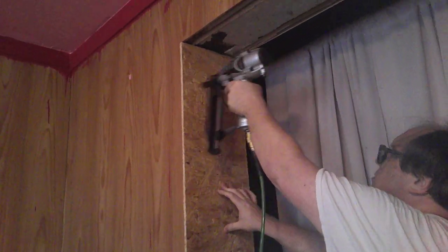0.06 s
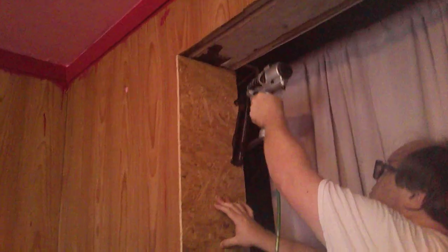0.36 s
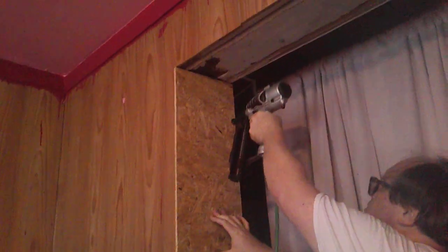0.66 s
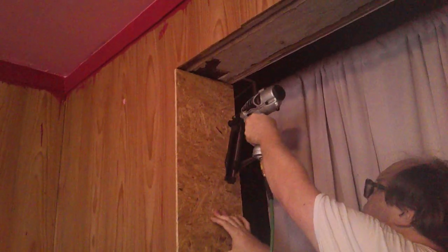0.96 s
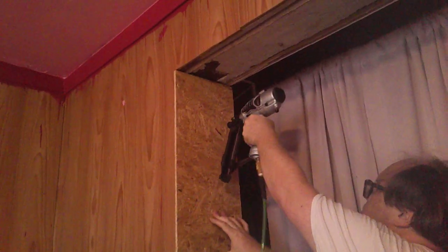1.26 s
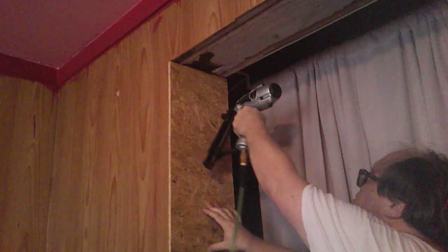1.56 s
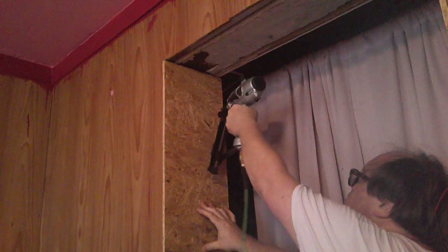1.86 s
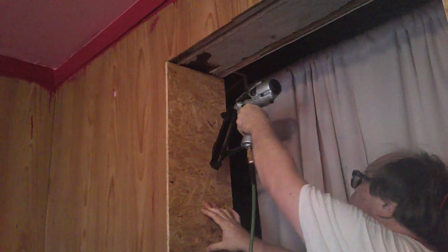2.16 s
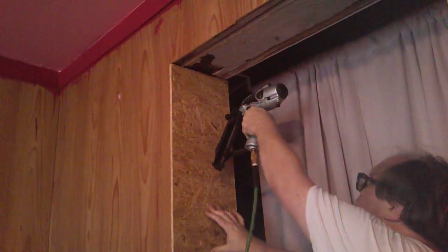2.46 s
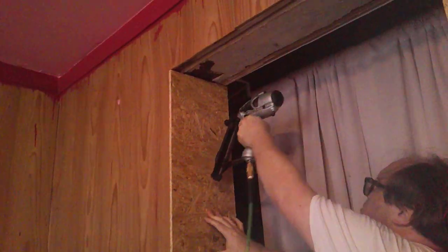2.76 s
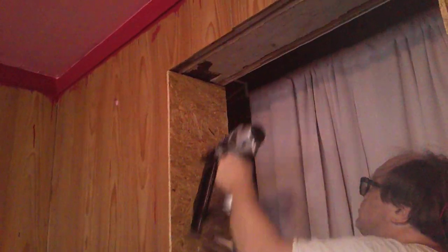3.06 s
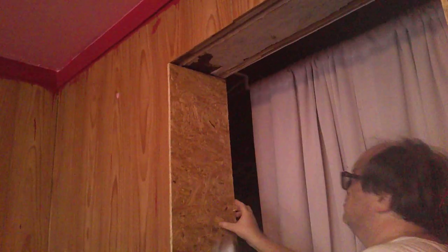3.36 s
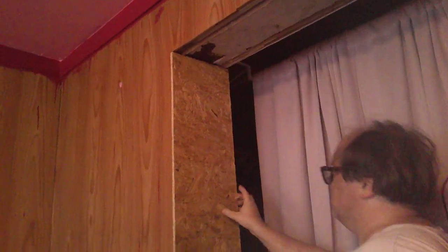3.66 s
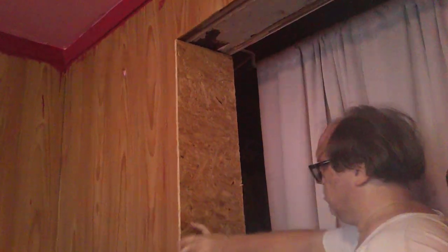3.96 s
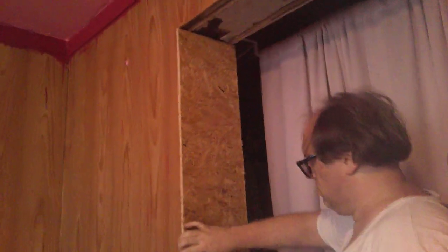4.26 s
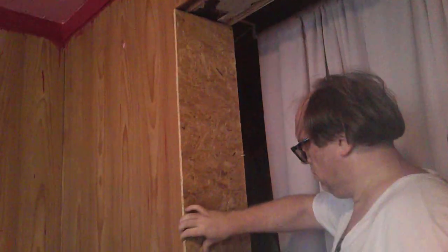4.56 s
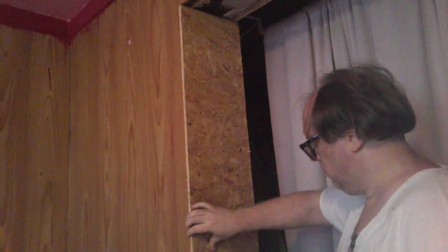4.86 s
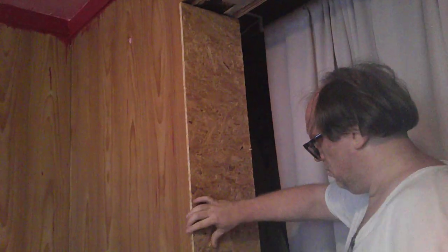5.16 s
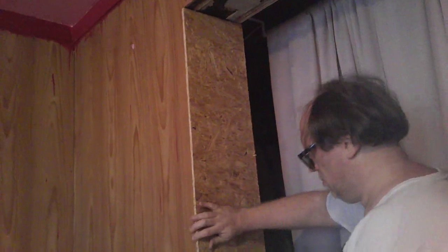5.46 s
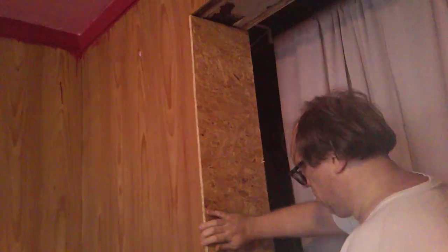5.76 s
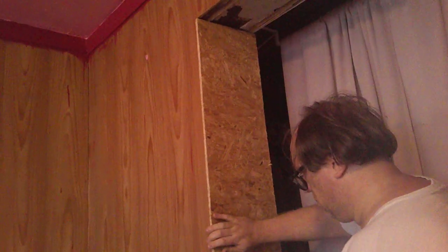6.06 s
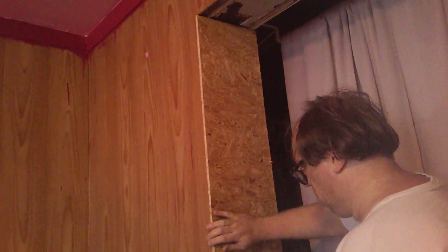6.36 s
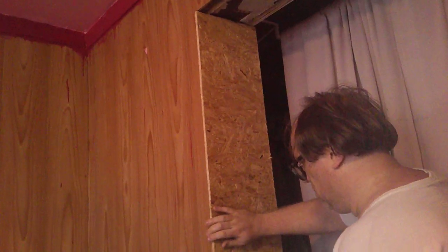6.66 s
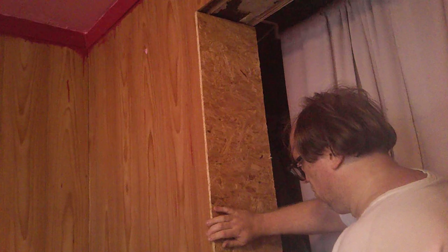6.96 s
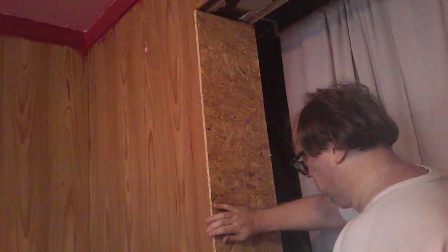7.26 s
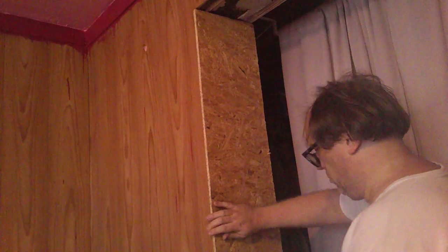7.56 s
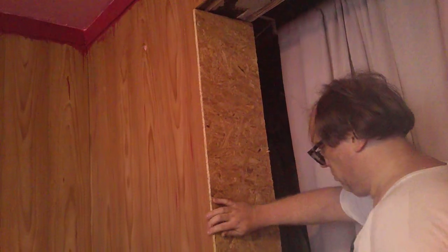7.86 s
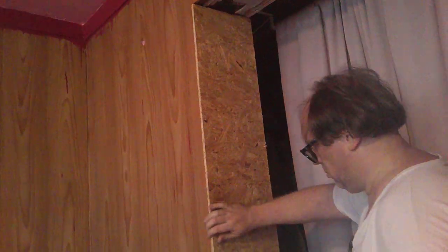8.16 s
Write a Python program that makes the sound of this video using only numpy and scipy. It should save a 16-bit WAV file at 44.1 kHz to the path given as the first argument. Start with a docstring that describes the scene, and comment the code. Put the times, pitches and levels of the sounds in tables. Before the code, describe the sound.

In a small, quiet room, a pneumatic nail gun knocks lightly against a wooden board and its metal fittings clink. It fires one loud, sharp shot, followed at once by a short hiss of air. Faint taps, scuffs and clinks follow as the tool and a hand move on the board, then a second shot and air burst. The shots are close and slightly overload the microphone.

```python
"""A pneumatic nailer drives two nails into a board lining a window recess, in a small panelled room.
Over low room tone, fittings clink and the tool knocks and scuffs against the board. At 2.4 s the first
shot lands, a double blow that overloads the microphone; the trigger is let go, the valve pings and air
puffs out. The tool and a steadying hand then knock and rub on the board until the second shot and its
puff of air at 7.3 s."""
import sys
import numpy as np
from scipy import signal
from scipy.fft import rfft, irfft
from scipy.io import wavfile
from scipy.ndimage import uniform_filter1d

SR = 44100
rng = np.random.default_rng(int(sys.argv[2]) if len(sys.argv) > 2 else 0)


def wrap_up_sound(samples):
    """Save the sound to the file named by the first command line argument, as 16-bit audio."""
    columns = np.atleast_2d(samples).T
    # keep every value between -1 and 1, then stretch to whole-number steps
    tamed = np.clip(columns, -1, 1)
    steps = np.round(tamed * 32767).astype(np.int16)
    wavfile.write(sys.argv[1], SR, steps)


N = 366030
HIT = SR // 2   # samples given to one event
AGE = np.arange(HIT) / SR
GRID_HZ = np.maximum(np.arange(4097) * SR / 8192, 1)
MIC_TOP_HZ = 8220

# room tone spectrum: f/Hz, level/dB
ROOM_TONE_EQ = [(12, -13.5), (25, -4), (60, -4), (90, -0.5), (170, 0), (250, -3.5), (360, -8), (560, -11.5),
                (1900, -17), (3200, -20.5), (5100, -28.5), (7200, -22), (9000, -30)]
# metal fittings click: t/s, level/dB, pitch/Hz, ring level/dB, ring t60/s
CLINK_CUES = [(0.001, -55, 2430, -54, 0.48), (0.7906, -46, 2920, -47, .2), (0.84, -42.5, 1910, -54, 0.18),
              (2.751, -48, 1830, -47, .2), (3.716, -54.5, 3070, -51, 0.14), (6.163, -44, 4040, -49, 0.21),
              (6.654, -59, 2380, -53.5, 0.055), (6.9749, -41.5, 2660, -50, 0.11)]
# modes of the fittings: f/Hz, level/dB
STEEL_MODES = [(1600, -9), (1745, -4), (2090, -2.5), (2400, -18), (2800, -7), (3400, -12), (4000, -10)]
# spectrum of loose parts jingling: f/Hz, level/dB
JINGLE_EQ = [(400, -16), (1200, -8), (1800, 2), (3300, -4.5), (5000, -9), (7200, -8), (9000, -13)]
# spectrum of a touch on the board: f/Hz, level/dB
TAP_EQ = [(60, -29), (300, 4), (700, -1.5), (1800, -2), (3300, -5.5), (5000, -15.5), (7200, -8.5),
          (9000, -11.5)]
# board resonances and the dips between them: f/Hz, width/Hz, gain/dB
BOARD_MODES = [(199, 28, 5.5), (305, 20, 4), (652, 84, 5), (741, 28, 5.5), (808, 30, 5), (990, 4, 2.5),
               (1040, 20, 0.5), (1141, 24, -0.5), (1450, 28, 4), (1550, 8, 7), (1674, 13, 2.5),
               (1652, 38, 5.5), (1680, 24, 2), (1830, 10, -4), (1874, 20, 3.5), (1937, 24, 7),
               (2030, 60, -5), (2103, 32, 6), (2508, 97, 6), (2670, 70, -5.5), (3080, 71, 1.5)]
# tool or knuckles knock on the board: t/s, level/dB, pitch of the spot/Hz, wall thud/dB
KNOCK_CUES = [(0.7897, -34, 547, -34.5), (0.8396, -36.5, 700, -42), (4.345, -54, 1520, -51),
              (4.4407, -59.5, 1100, -57.5), (4.6795, -58, 910, -57.5), (5.4362, -53.5, 1520, -56),
              (6.159, -44.5, 720, -42.5), (6.976, -42.5, 1060, -47.5)]
# spectrum of the wall behind the board: f/Hz, level/dB
THUD_EQ = [(40, -45), (100, -21), (165, -9.5), (205, 5), (280, -12.5), (340, -17), (420, -9), (700, -19),
           (3000, -62)]
# soft scuffs against the board: t/s, level/dB, pitch of the spot/Hz
SCUFF_CUES = [(0.806, -41, 685), (0.824, -44.5, 1790), (1.848, -61.5, 880), (3.184, -60.5, 1800),
              (3.463, -60, 680), (3.692, -55, 1310), (5.473, -57.5, 770), (6.208, -47, 724),
              (6.276, -55.5, 895), (7.005, -50, 1096)]
# two blows to each shot: t/s, level/dB, pitch of the spot/Hz, its width/Hz, its boost/dB
BLOW_CUES = [(2.4225, -1.5, 737.7, 200, 1.5), (2.4380, -0.5, 718, 160.2, 7), (7.2591, -2.5, 1400, 600, -1),
             (7.2726, 1.5, 1172, 811, 7)]
# spectrum of a blow: f/Hz, level/dB
BLOW_EQ = [(40, -40.5), (110, -33.5), (200, -18), (300, -6.5), (400, -6), (600, -7.5), (1400, -1),
           (2200, -6), (3300, -9.5), (5000, -21), (7200, -18), (9000, -19.5)]
# trigger valve snaps open: t/s, level/dB
VALVE_CUES = [(2.5566, 0), (7.3708, -3.5)]
# cylinder vents: t/s, hiss/dB, length/s, puff/dB, hiss tilt/(dB per octave)
EXHAUST_CUES = [(2.5638, -7.5, 0.034, -14, -2.5), (7.371, -4.5, 0.036, -16.5, -1.9)]
# spectrum of the air jet: f/Hz, level/dB
HISS_EQ = [(30, -44), (100, -21.5), (300, -5), (800, -4), (1600, 1.5), (3000, -0.5), (5000, -3.5),
           (6200, 1), (7200, 6), (9000, -1)]
# spectrum of the low puff under it: f/Hz, level/dB
PUFF_EQ = [(30, -46), (85, -31), (130, -3), (185, -1.5), (265, -9), (355, -2.5), (600, -18), (2000, -35.5)]
# hand slides on the board: middle t/s, level/dB, half length/s
RUB_CUES = [(4.215, -58.5, .022), (6.39, -58, 0.068), (6.936, -58, 0.035), (6.967, -47.5, 0.022)]


def from_db(db):
    return 10 ** (np.asarray(db) / 20)


def rms_one(x):
    return x / np.sqrt(np.mean(x ** 2) + 1e-20)


def level_hit(x):
    """Scale a short sound to the energy of 30 ms at rms 1."""
    return x * np.sqrt(.03 * SR / np.sum(x ** 2))


def eq_db(points):
    """Draw an EQ curve through the points along log frequency."""
    hz, db = np.transpose(points)
    return np.interp(np.log(GRID_HZ), np.log(hz), db)


def bell(hz, width_hz):
    """Outline of one resonance, height 1."""
    return 1 / (1 + (2 * (GRID_HZ - hz) / width_hz) ** 2)


def board_db():
    """The board's resonances as one EQ curve."""
    return sum(db * bell(hz, width_hz) for hz, width_hz, db in BOARD_MODES)


def colour(x, curve_db):
    """Minimum-phase EQ: peaks ring after the hit, never before."""
    cepstrum = irfft(np.log(from_db(curve_db)))
    half = len(cepstrum) // 2
    cepstrum[1:half] *= 2
    cepstrum[half + 1:] = 0
    impulse_response = irfft(np.exp(rfft(cepstrum)))
    return signal.fftconvolve(x, impulse_response)[:len(x)]


def low_pass(x, hz, taps):
    """Steep linear-phase high cut."""
    kernel = signal.firwin(taps, hz, window="blackmanharris", fs=SR)
    return signal.fftconvolve(x, kernel[None], "same")


def add(track, s, sound):
    """Mix a sound in at time s."""
    at = max(round(s * SR), 0)
    track[at:at + len(sound)] += sound[:N - at]


def noise_with_tail(power, wet_db, t60):
    """Turbulence or chatter with this power envelope, plus a dying tail of dense reflections."""
    feedback = from_db(-120 / (t60 * SR))   # power falls 60 dB in t60 seconds
    reflections = signal.lfilter([1 - feedback], [1, -feedback], power)
    envelope = np.sqrt(power + from_db(wet_db) ** 2 * reflections)
    return level_hit(rng.standard_normal(HIT) * envelope)


def contact(length_s, crack_db, wet_db, t60):
    """A sharp crack straight from the impact, then dying chatter and its reverb."""
    crack = from_db(crack_db) * level_hit(signal.unit_impulse(HIT))
    return crack + noise_with_tail(np.exp(-2 * AGE / length_s), wet_db, t60)


def tap(pitch_hz, rolloff_db, length_s, crack_db):
    """One touch on the board: the spot resonates, with rolloff_db less per octave to either side."""
    spot_db = 8.5 * bell(pitch_hz, width_hz=200) - rolloff_db * np.abs(np.log2(GRID_HZ / pitch_hz))
    force = contact(length_s, crack_db, wet_db=3, t60=.2)
    return level_hit(colour(force, eq_db(TAP_EQ) + board_db() + spot_db))


def room_tone():
    """A steady bed of low room rumble and microphone hiss."""
    bed = colour(rng.standard_normal(N + HIT), eq_db(ROOM_TONE_EQ))[HIT:]
    return from_db(-58) * rms_one(bed)


def clinks():
    """A bright click, then steel rings and loose parts jingle, only briefly where a hand damps them."""
    out = np.zeros(N)
    for s, db, pitch_hz, ring_db, t60 in CLINK_CUES:
        steel = sum(from_db(mode_db) * np.sin(2 * np.pi * (hz * AGE + rng.random()))
                    for hz, mode_db in STEEL_MODES)
        jingle = from_db(2.5) * rms_one(colour(rng.standard_normal(HIT), eq_db(JINGLE_EQ)))
        ring = (steel + jingle) * from_db(-60 * AGE / t60)
        click = tap(pitch_hz, rolloff_db=1, length_s=.0021, crack_db=-12.5)
        add(out, s, from_db(db) * click + from_db(ring_db) * ring)
    return out


def knocks():
    """Firm knocks on the board sound broad, light ones narrow; the wall behind thuds."""
    out = np.zeros(N)
    firm_db, narrowing = -32, .15   # level of a firm knock; extra rolloff per dB softer
    for s, db, pitch_hz, thud_db in KNOCK_CUES:
        board = tap(pitch_hz, rolloff_db=6 + narrowing * (firm_db - db), length_s=.0022, crack_db=-2)
        wall = colour(contact(length_s=.0022, crack_db=-4, wet_db=8, t60=.3), eq_db(THUD_EQ))
        add(out, s, from_db(db) * board + from_db(thud_db) * level_hit(wall))
    return out


def scuffs():
    """Slow, glancing touches stir the board but not the wall."""
    out = np.zeros(N)
    for s, db, pitch_hz in SCUFF_CUES:
        add(out, s, from_db(db) * tap(pitch_hz, rolloff_db=3.5, length_s=.012, crack_db=-8))
    return out


def shots():
    """Driver meets nail, then the piston bottoms out; the board booms and rattles against its frame."""
    out = np.zeros(N)
    ring_depth = .93   # board resonances, relative to a light tap
    for s, db, pitch_hz, width_hz, boost_db in BLOW_CUES:
        body_db = eq_db(BLOW_EQ) + ring_depth * board_db() + boost_db * bell(pitch_hz, width_hz)
        force = contact(length_s=.023, crack_db=-7.5, wet_db=5.5, t60=.26)
        add(out, s, from_db(db) * level_hit(colour(force, body_db)))
    return out


def valve():
    """The trigger valve snaps open with a ping of a few cycles."""
    out = np.zeros(N)
    pitch_hz, attack_s = 2335, .00058
    rise = AGE / attack_s
    ping = np.sin(2 * np.pi * pitch_hz * AGE) * rise * np.exp(1 - rise)
    for s, db in VALVE_CUES:
        add(out, s, from_db(db) * ping)
    return out


def exhausts():
    """Air splutters out until the cylinder is empty: a bright hiss over a low puff."""
    out = np.zeros(N)
    splutter_db, pressure_fall_s, crossover_hz = 2, .19, 4900
    low_share = np.clip(1 / (1 + (GRID_HZ / crossover_hz) ** 4), 1e-4, 1 - 1e-4)
    for s, hiss_db, length_s, puff_db, tilt_db in EXHAUST_CUES:
        splutter = rms_one(uniform_filter1d(rng.standard_normal(HIT), size=130))
        pressure = np.exp(-AGE / pressure_fall_s) / (1 + (AGE / length_s) ** 6)
        flow = from_db(splutter_db * splutter) * pressure
        jet_db = eq_db(HISS_EQ) + tilt_db * np.log2(GRID_HZ / MIC_TOP_HZ)
        jet = np.zeros(HIT)
        for share, t60 in ((low_share, .33), (1 - low_share, .26)):   # the room loses its treble first
            turbulence = noise_with_tail(flow ** 2, wet_db=-2.5, t60=t60)
            jet += colour(turbulence, jet_db + 10 * np.log10(share))
        puff = colour(contact(length_s=.02, crack_db=-2, wet_db=-5, t60=.12), eq_db(PUFF_EQ))
        add(out, s, from_db(hiss_db) * level_hit(jet) + from_db(puff_db) * level_hit(puff))
    return out


def rubs():
    """Skin drags over the rough board in soft swells."""
    pitch_hz, rolloff_db = 850, 7.5
    t = np.arange(N) / SR
    speed = sum(from_db(db) * np.exp(-((t - s) / half_s) ** 2) for s, db, half_s in RUB_CUES)
    softness_db = -rolloff_db * np.abs(np.log2(GRID_HZ / pitch_hz))
    friction = colour(rng.standard_normal(N), eq_db(TAP_EQ) + board_db() + softness_db)
    return speed * rms_one(friction)


def scene():
    """Mono mix: the nailer up front, then the handling, with room tone underneath."""
    nailer = shots() + valve() + exhausts()
    handling = knocks() + scuffs() + clinks() + rubs()
    return (nailer + handling + room_tone())[None]


def record(dry):
    """The shots overload the input, the top end is cut, and the peaks clip once more at the output."""
    input_ceiling, output_ceiling = from_db(-2.5), from_db(-2.85)
    overloaded = np.clip(dry, -input_ceiling, input_ceiling)
    dulled = low_pass(overloaded, MIC_TOP_HZ, taps=141)
    flattened = np.clip(dulled, -output_ceiling, output_ceiling)
    return low_pass(flattened, hz=16000, taps=201)


dry = scene()
out = record(dry)
wrap_up_sound(out)
```